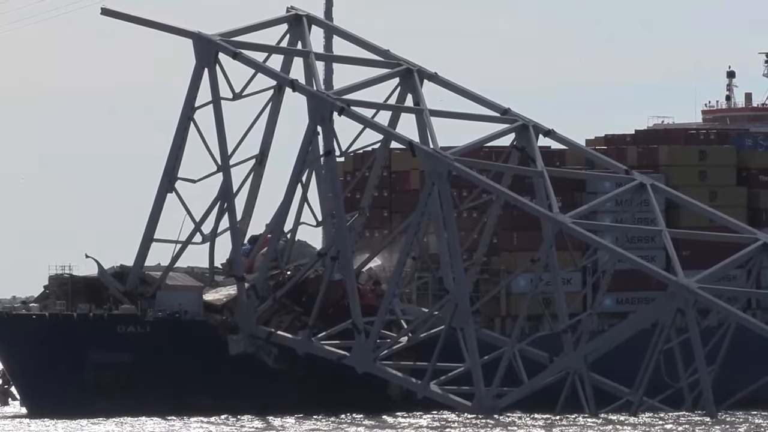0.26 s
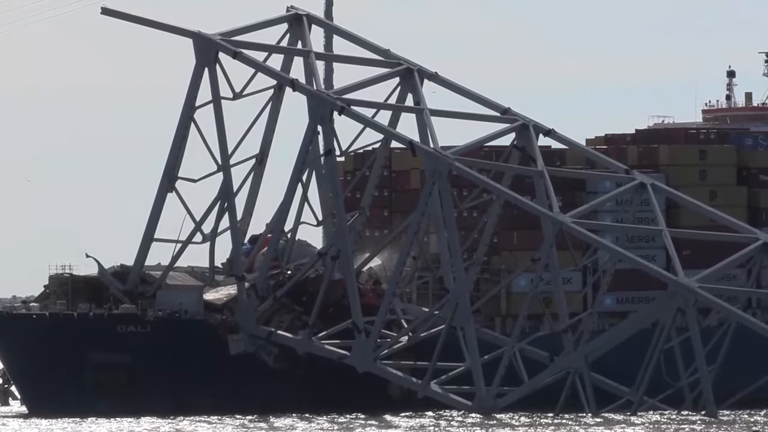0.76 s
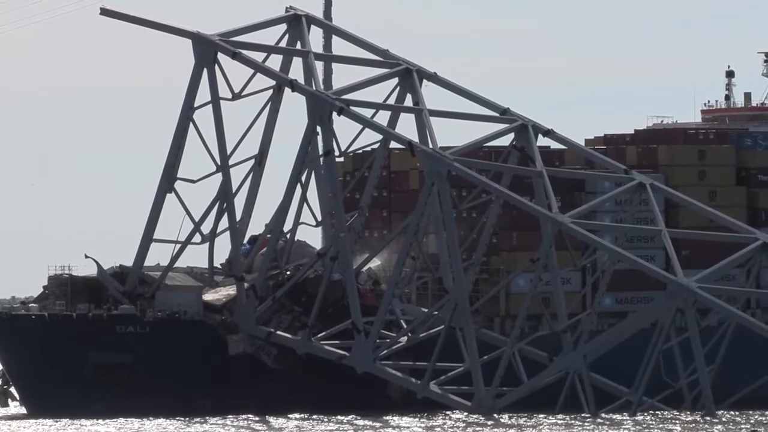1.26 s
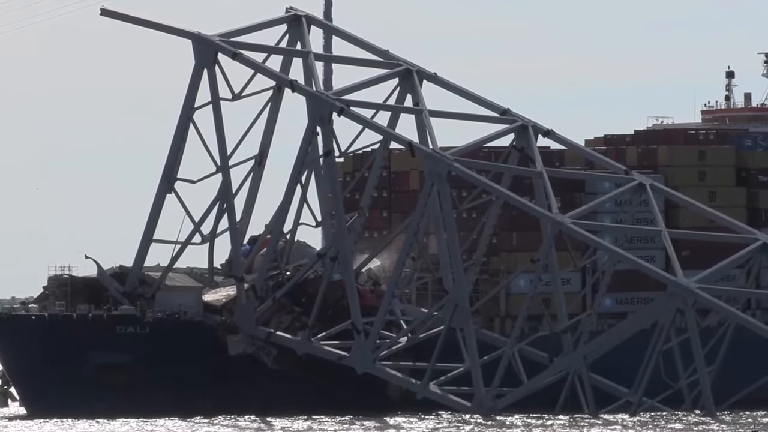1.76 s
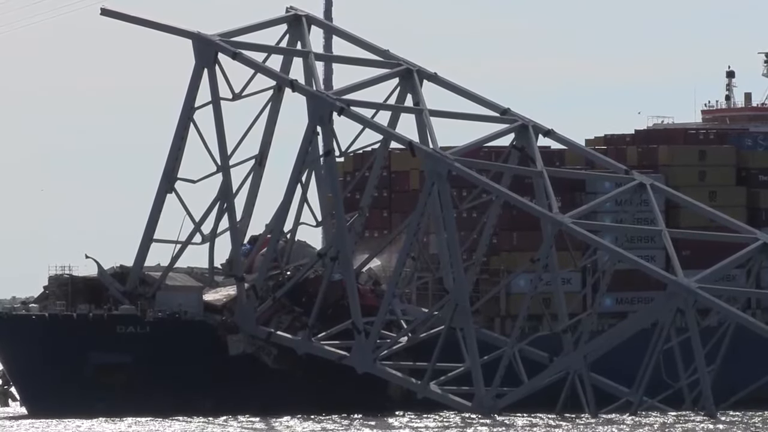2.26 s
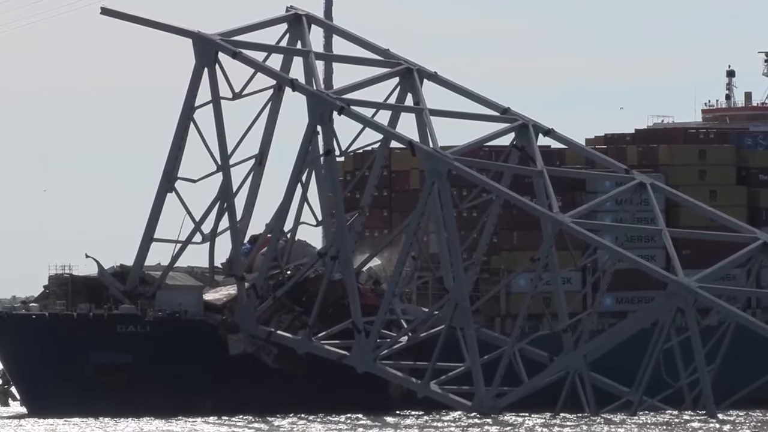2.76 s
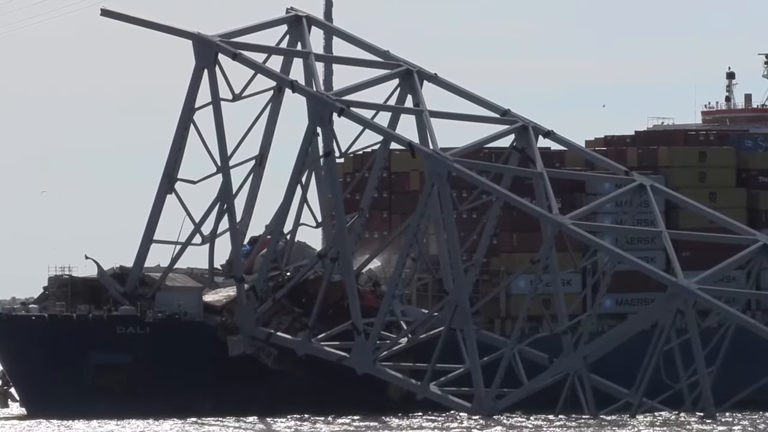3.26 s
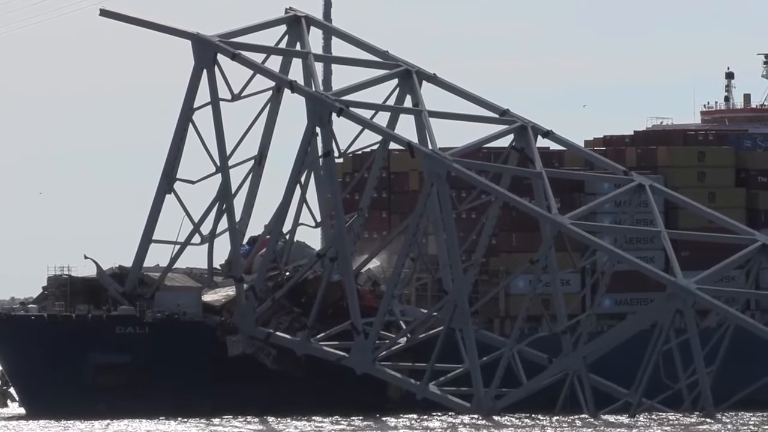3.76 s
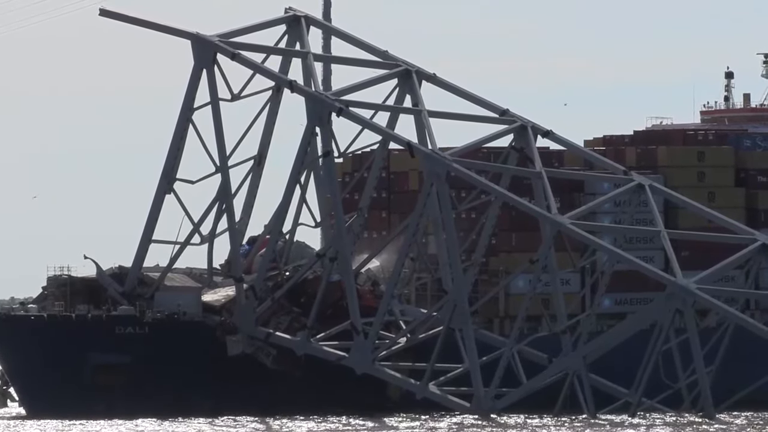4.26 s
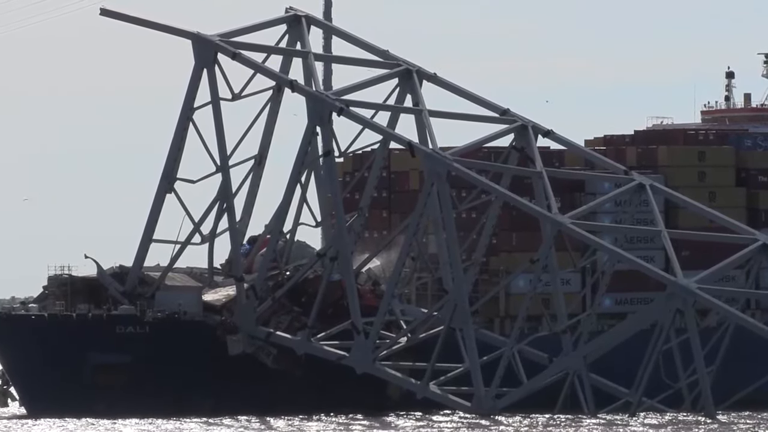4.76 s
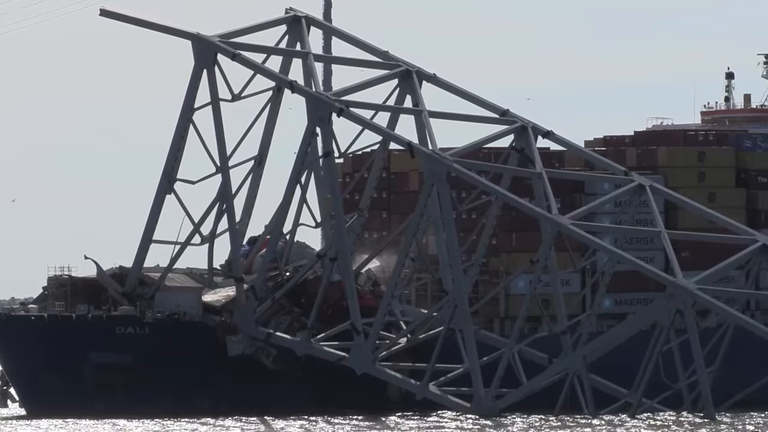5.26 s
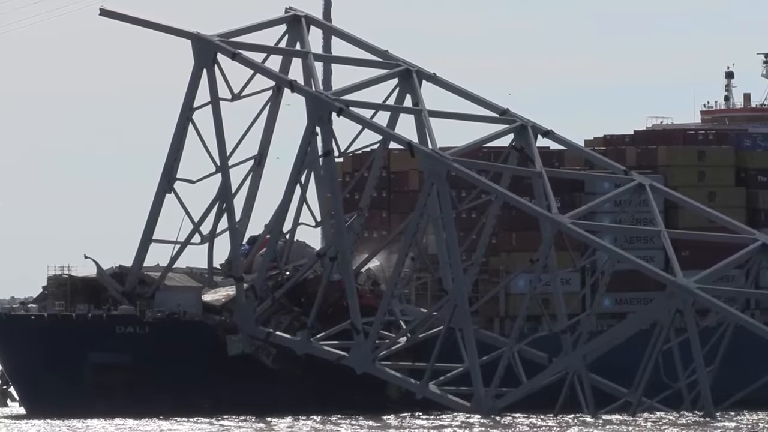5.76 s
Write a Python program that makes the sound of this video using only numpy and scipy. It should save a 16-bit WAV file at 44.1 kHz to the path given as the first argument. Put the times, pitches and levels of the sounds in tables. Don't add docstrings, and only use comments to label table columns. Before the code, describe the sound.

From 0 to 6 seconds a ship's air horn sounds one continuous low blast, already at full strength at the start and still going at the end. The pitch is a deep note around 154 hertz, creeping up very slightly until about 2 seconds, then settling a touch lower. Rapid diaphragm cracks make it brassy, buzzing and hard-edged, and it overloads the microphone into flat, gritty distortion. Until about 1.3 seconds it is full and throaty; from 1.5 to 2.5 a brighter metallic rim comes forward; after 3 it grows somewhat thinner and steadier. Throughout, hissing air and treble buzz flutter several times a second as gusts pass, dulling briefly near 2.3 and 5.3. Close echoes from water, hull and girders thicken the note. Low wind puffs and a faint engine hum stay mostly buried in this open outdoor waterside space.

```python
import sys
import numpy as np
from scipy import signal
from scipy.fft import rfft, irfft, next_fast_len
from scipy.io import wavfile
from scipy.ndimage import uniform_filter1d

SR = 44100
rng = np.random.default_rng(int(sys.argv[2]) if len(sys.argv) > 2 else 0)


def gain_from_db(level_db):
    decades = np.asarray(level_db, float) / 20
    return 10 ** decades


def dump_mix(stems):
    frames = np.atleast_2d(stems).T
    limited = np.clip(frames, -1, 1)
    pcm = np.round(limited * 32767).astype(np.int16)
    wavfile.write(sys.argv[1], SR, pcm)


N = 265041


def in_time(rows):
    s, *columns = np.transpose(rows)
    return [np.interp(np.arange(N) / SR, s, c) for c in columns]


def heard(bearing, values):
    return np.interp(bearing, np.arange(5), values)


def rms_one(x):
    return x / np.sqrt(np.mean(x ** 2) + 1e-20)


def drift(rate_hz):
    r = np.exp(-2 * np.pi * rate_hz / SR)
    wander = signal.lfilter([1], [1, -2 * r, r * r], rng.standard_normal(N + SR))
    return rms_one(wander[SR:])


def coloured(spectrum):
    size = next_fast_len(N)
    hz, db = np.transpose(spectrum)
    bins_hz = np.arange(size // 2 + 1) * SR / size
    shape = gain_from_db(np.interp(np.log(bins_hz + 1), np.log(hz), db, left=-90))
    return rms_one(irfft(rfft(rng.standard_normal(size)) * shape, size)[:N])


def ring(x, modes):
    out = 0
    for hz, width, db, sign in modes:
        warped = 2 * SR * np.tan(np.pi * hz / SR)
        b, a = signal.bilinear([1, 0], [1, 2 * np.pi * width, warped ** 2], SR)
        out = out + np.sign(sign) * gain_from_db(db) * SR * signal.lfilter(b, a, x)
    return out


def passed(x, hz, kind, order=1):
    return signal.sosfilt(signal.butter(order, hz, kind, fs=SR, output="sos"), x)


def late(x, ms):
    return np.interp(np.arange(N) - ms * SR / 1000, np.arange(N), x, left=0)


def dip(x, hz, width, share):
    band = signal.lfilter(*signal.iirpeak(hz, hz / width, SR), x)
    return x - np.clip(share, 0, 1) * band


def gusts(rows, rise_db, fall_db, calm_db):
    t = np.arange(0, N + 64, 64) / SR
    s, length, db = np.transpose(rows)[:, :, None]
    level = db - rise_db * np.maximum(s - t, 0) - fall_db * np.maximum(t - s - length, 0)
    return np.interp(np.arange(N) / SR, t, np.maximum(level.max(axis=0), calm_db))


def closings(cycles, uneven_db):
    at = np.interp(np.arange(2, cycles[-1]), cycles, np.arange(N))[:, None]
    size = gain_from_db(uneven_db * rng.standard_normal(N)[:len(at), None])
    near = at.astype(int) + np.arange(-7, 9)
    clicks = np.full(N + 16, 1e-18)
    clicks[near] = size * np.sinc(near - at) * np.cos(np.pi * (near - at) / 16) ** 2
    return clicks[:N]


def column_drone(cycles, bearing, swell_db):
    # level_db, and lag_cycles from the crack to the crest
    first_db, first_lag = (-10.5, -9, -12, -10.5, -8.5), (.7, .68, 0.81, 0.75, 0.758)
    second_db, second_lag = (-14.5, -14, -12, -15, -15), (0.1, .1, .14, .12, .12)
    first = np.cos(2 * np.pi * (cycles - heard(bearing, first_lag)))
    second = np.cos(4 * np.pi * (cycles - heard(bearing, second_lag)))
    return gain_from_db(heard(bearing, first_db) + swell_db) * first + gain_from_db(heard(bearing, second_db)) * second


def bell_crack(clicks, bearing, gust_db):
    # mode_hz, width_hz, level_db, sign
    throat = [(427, 577, -2, 1), (789, 79, -24.5, 1)]
    flare = [(1522, 500, -3.5, 1), (2180, 200, -22, -1)]
    rim = [(2758, 156, -12.5, 1), (3137, 323, -4, 1), (3517, 40, -15.5, -1)]
    # mode_hz, width_hz, level_db, sign
    shoulder = [(1803, 152, -13.5, 1), (2970, 200, -7.5, 1)]
    throat_db, flare_db, rim_db = (8, 4.8, 6.1, 3.8, 1.37), (13.4, 8.4, 7.3, 8.4, 2.6), (-8, 6, 14, 14, 7.5)
    rim_level_db = heard(bearing, rim_db) + 0.25 * gust_db + 0.27 * drift(9.9)
    bright = gain_from_db(heard(bearing, flare_db)) * ring(clicks, flare)
    bright += gain_from_db(rim_level_db) * ring(clicks, rim)
    bright += ring(clicks, shoulder)
    return gain_from_db(heard(bearing, throat_db)) * ring(clicks, throat), bright


def echoes(crack, bright, bearing):
    # water_share (negative turns over), steel_share, steel_delay_ms
    water_share = (0.081, 0.19, -0.22, -0.19, -0.91)
    steel_share, steel_delay_ms = (-0.014, -0.24, -0.17, 0.15, 0.19), (4.76, 4.95, 4.3, 4.93, 4.75)
    # delay_ms, level_db
    far = [
        (11.3, -27),
        (17.9, -28),
        (29.1, -35.5),
        (43.7, -46),
        (67.0, -21.5),
    ]
    thin = passed(passed(crack, 140, "high"), 140, "high")
    water = heard(bearing, water_share) * late(crack, 1.416)
    steel = heard(bearing, steel_share) * late(thin, heard(bearing, steel_delay_ms))
    out = crack + water + steel
    for ms, db in far:
        out += gain_from_db(db + 2.5 * drift(1.0)) * late(bright, ms + .02 * drift(1.0))
    return out


def radiated(crack, bearing):
    # centre_hz, width_hz, shares removed at bearings 0-4
    valleys = [(932.5, 120, (0.46, 0.55, 0.21, 0.91, 0.79)), (3624, 620, (0.71, 1, 1, 0.9, 0.99)),
               (2185, 670, (0.73, 0.69, 1, 0.29, .17)), (2010, 110, (0.36, 0.59, .05, .05, .05)),
               (2290, 140, (0.32, .2, 0.98, .05, .05)), (2165, 58, (.05, .2, .05, .4, .3)),
               (3855, 90, (0.042, .05, .2, .6, 0.6))]
    crack = passed(passed(crack, 918, "low"), 918, "low")
    for hz, width, shares in valleys:
        crack = dip(crack, hz, width, heard(bearing, shares))
    return crack


def ringing_steel(clicks, bearing, gust_db):
    # mode_hz, width_hz, level_db, sign
    low_plate = [(1546, 40, 0, 1)]
    high_plates = [(2161, 25, -3, -1), (2625, 25, -3, 1), (3243, 25, -1, -1), (3706, 25, 4, -1)]
    top_plate = [(4495, 30, 0, 1), (4030, 30, -8, 1)]
    # mode_hz, width_hz, level_db, sign
    rim_girders = [(3565, 30, 0, 1), (3720, 30, -3, -1), (3875, 30, -7, 1), (4030, 30, -1, -1),
                   (4185, 30, -5, 1), (4340, 30, -1, -1)]
    flank_girders = [(2315, 30, 0, 1), (3705, 30, -1, -1), (4015, 30, -4, 1), (4940, 30, 0, -1)]
    low_db, high_db, top_plate_db = (-24, -21, -33, -33.5, -35.5), (-29, -28, -61, -37, -49), (-61, -40, -42.5, -43,
                                                                                   -45.5)
    rim_girders_db, flank_girders_db = (-55, -38, -34.5, -39.5, -44), (-60, -55, -55, -43.5, -41.5)
    follow = (.1, 0.78, 0.98, 0.32, .3)
    pieces = (low_plate, high_plates, top_plate, rim_girders, flank_girders)
    levels = (low_db, high_db, top_plate_db, rim_girders_db, flank_girders_db)
    out = 0
    for modes, db, follows in zip(pieces, levels, follow):
        tone = rms_one(passed(ring(clicks, modes), 4300, "low", order=2))
        out = out + gain_from_db(heard(bearing, db) + follows * gust_db - 3.5) * tone
    return out


def buzz(cycles, top_db):
    # lag_cycles, level_db
    arrivals = [
        (0.0, 14),
        (0.164, -12),
        (0.411, 15.5),
        (.68, 5),
        (0.828, 3),
    ]
    # mode_hz, width_hz, level_db, sign
    lip = [(5000, 500, -2, 1), (5900, 700, 2, -1), (7200, 700, 1, 1), (8600, 800, 0, -1), (9800, 800, 2, 1),
           (11300, 1000, -1, -1), (13000, 900, -3, 1)]
    fronts = 0
    for lag, db in arrivals:
        fronts = fronts + gain_from_db(db) * closings(cycles - lag + 0.0042 * drift(0.55), uneven_db=0.3)
    fronts = passed(fronts, 4500, "high", order=2)
    edge = sum(gain_from_db(2.0 * drift(.9)) * ring(fronts, [mode]) for mode in lip)
    return gain_from_db(.5 * top_db - 23.0) * rms_one(dip(edge, 4790, 150, 0.7))


def escaping_air(cycles, bearing, top_db):
    # freq_hz, level_db_per_hz
    hiss = [(130, -4), (250, -1), (500, -4.5), (750, -3), (1500, -2.5), (2300, -3.5), (3100, -1.5),
            (4200, -9), (7000, -17), (15000, -70)]
    # freq_hz, level_db_per_hz
    spray_spectrum = [(1800, -11), (2400, -9.5), (3100, -3), (4200, -9.5), (7000, -6.5), (10000, -8),
                      (13000, -10), (17000, -21.5)]
    bearing_db = (1.8, -0.62, -0.44, 1.1, 0.44)
    turn = 2 * np.pi * (cycles - .78)
    spurt_db = -4.0 * np.cos(turn) - 1.5 * np.cos(2 * turn)
    leak_db = heard(bearing, bearing_db) + 0.35 * (top_db - top_db.mean())
    leak = coloured(hiss) * gain_from_db(.55 * spurt_db + 1.0 * drift(13.0) - 35.0 + leak_db)
    spray = coloured(spray_spectrum) * gain_from_db(spurt_db - 0.2 + 1.1 * drift(350.0))
    highest = passed(spray, 6000, "high", order=2)
    return leak + gain_from_db(top_db) * (spray - highest) + gain_from_db(1.404 * top_db + 13.5) * highest


def horn(top_db):
    # time_s, pitch_hz
    pitch = [(0.04, 153.91), (0.6, 154.46), (1.2, 154.8), (1.55, 155.07), (2.22, 155.05), (2.7, 154.3),
             (3.15, 154.09), (3.5, 154.22), (4.4, 154.41), (4.6, 154.32), (4.85, 154.49), (5.6, 154.58),
             (5.8, 154.43), (5.96, 154.58)]
    # time_s, bearing_0_to_4, drone_swell_db
    swing = [(0, 0.23, 0.7), (.45, 0.05, -0.7), (.85, 0.74, .5), (1.25, 1.24, -0.5), (1.5, 2.22, 0.3),
             (2.1, 2.1, 0.6), (2.4, 2.45, 0.5), (2.8, 3.13, 0.2), (3.2, 3.54, -0.5), (3.6, 3.76, 0),
             (4.0, 3.56, -0.8), (4.4, 3.87, 0), (4.8, 3.44, -1.5), (5.2, 3.66, -0.6), (5.6, 3.98, 0.5),
             (6, 3.8, -.8)]
    cycles = np.cumsum(in_time(pitch)[0]) / SR + 1.35
    bearing, swell_db = in_time(swing)
    gust_db = (top_db - top_db.mean()) * np.clip(bearing - 2, 0, 1)
    clicks = closings(cycles + .0004 * drift(20.0), uneven_db=.2)
    throat, bright = bell_crack(clicks, bearing, gust_db)
    crack = radiated(echoes(throat + bright, bright, bearing), bearing)
    out = column_drone(cycles, bearing, swell_db) + crack
    out += ringing_steel(clicks, bearing, gust_db)
    return out + buzz(cycles, top_db) + escaping_air(cycles, bearing, top_db)


def carried_top():
    # start_s, length_s, level_db
    carry = [(0, 0.21, -40), (.28, 0.05, -36.5), (.58, .27, -38), (.95, 0.23, -36.5), (1.37, .01, -38),
             (1.54, 0.19, -36), (1.94, 0.14, -35.5), (2.19, 0.36, -41.5), (2.68, .01, -39),
             (2.81, 0.1, -35.5), (3.16, .03, -38), (3.46, .01, -43), (3.65, 0.13, -38), (3.92, .1, -39.5),
             (4.28, 0.018, -37), (4.45, 0.023, -38), (4.6, 0.19, -37.5), (4.8, 0.022, -35.5),
             (5.02, 0.094, -36), (5.25, 0.27, -44), (5.55, 0.23, -40.5), (5.78, 0.05, -37), (6.0, .01, -45)]
    return gusts(carry, rise_db=96, fall_db=75, calm_db=-49)


def wind():
    # start_s, length_s, level_db
    puffs = [(.04, .08, -29.5), (.2, 0.14, -40), (.52, .01, -28), (.6, 0.011, -34), (.74, .06, -35),
             (1.05, 0.011, -35), (1.15, .15, -42), (1.42, .01, -37), (1.57, .01, -35), (1.9, .12, -38),
             (2.3, .12, -38), (2.46, 0.064, -29.5), (2.79, .01, -31), (2.97, .01, -50), (3.14, .01, -58),
             (3.28, .01, -48), (3.41, 0.084, -33), (3.62, .05, -36), (4.25, .01, -29), (4.45, .04, -37),
             (4.8, .03, -31), (4.95, .1, -42), (5.26, .01, -31), (5.34, .01, -34), (5.44, .01, -37),
             (5.56, .01, -40), (5.67, .01, -39), (6.0, .01, -33)]
    # freq_hz, level_db_per_hz
    rumble = [(15, -11), (30, 1.5), (60, 3.5), (110, -5), (200, -14.5), (400, -31), (900, -38)]
    puff_db = gusts(puffs, rise_db=212, fall_db=155, calm_db=-45.5)
    noise = coloured(rumble)
    noise = noise / (uniform_filter1d(noise ** 2, size=4000) + 0.045) ** 0.58
    return gain_from_db(puff_db + 0.5 + 0.99 * drift(9.0)) * rms_one(noise)


def engine():
    # tone_hz, width_hz, level_db
    hum = [
        (59.9, 3, -64),
        (191.2, 9.5, -45.5),
        (211, 4, -47),
        (238.3, 6.5, -51.5),
    ]
    white = rng.standard_normal(N)
    out = 0
    for hz, width, db in hum:
        mode = [(hz, width, 0, 1)]
        out = out + gain_from_db(db) * rms_one(ring(ring(white, mode), mode))
    return out


def scene():
    return (horn(carried_top()) + wind() + engine())[None]


def low_pass(x):
    return signal.sosfilt(signal.butter(12, 15040, fs=SR, output="sos"), x)


def record(dry):
    clipped = passed(np.clip(dry, -0.48, 0.48), 18, "high")
    cut = signal.sosfilt(signal.cheby2(14, 60, 17000, fs=SR, output="sos"), clipped)
    return low_pass(cut)


dry = scene()
out = record(dry)
dump_mix(out)
```